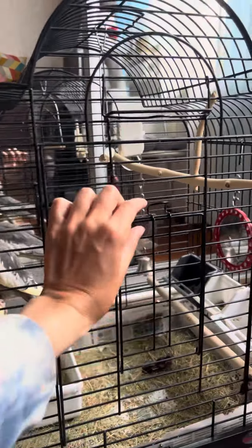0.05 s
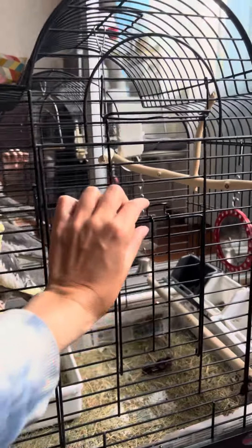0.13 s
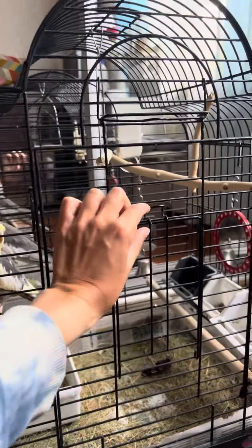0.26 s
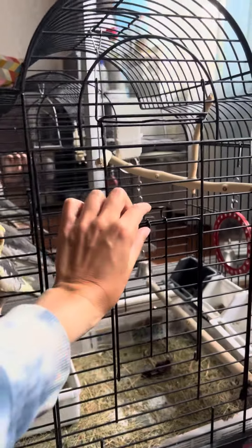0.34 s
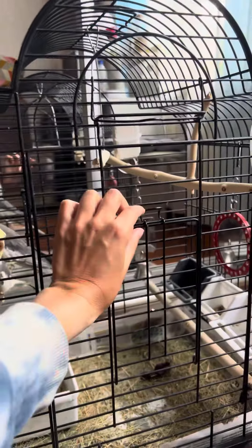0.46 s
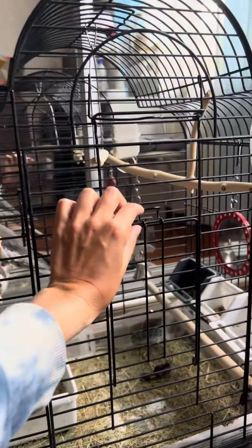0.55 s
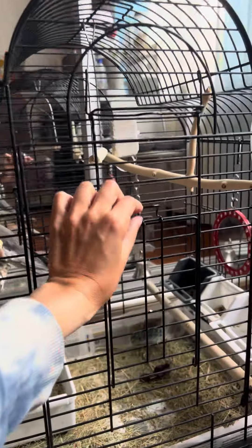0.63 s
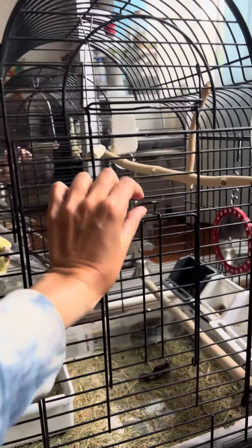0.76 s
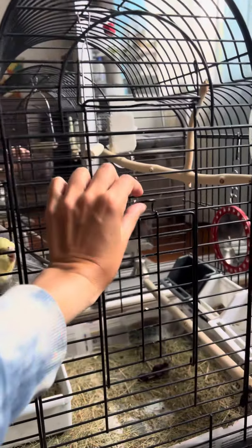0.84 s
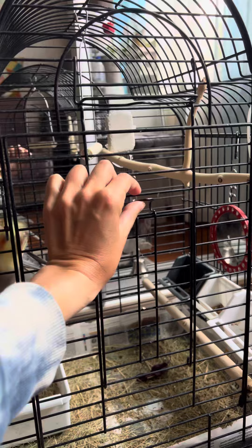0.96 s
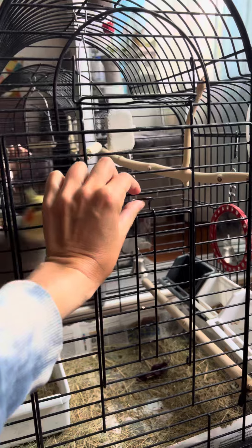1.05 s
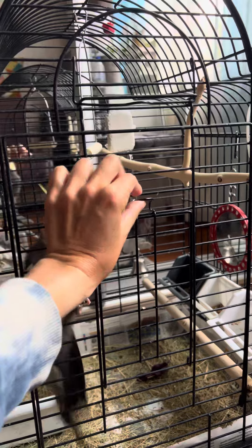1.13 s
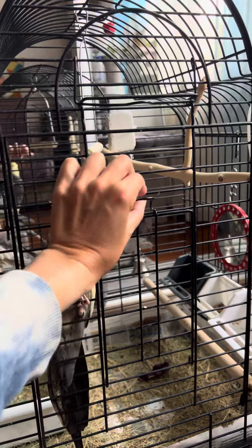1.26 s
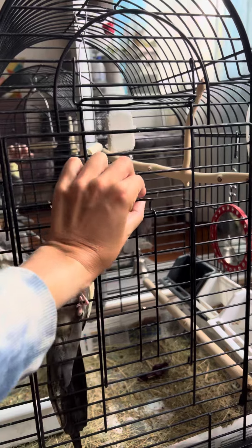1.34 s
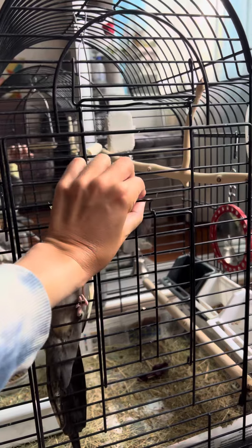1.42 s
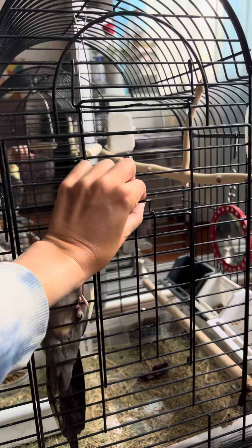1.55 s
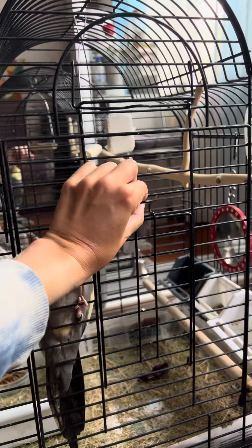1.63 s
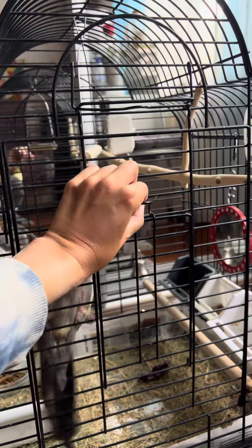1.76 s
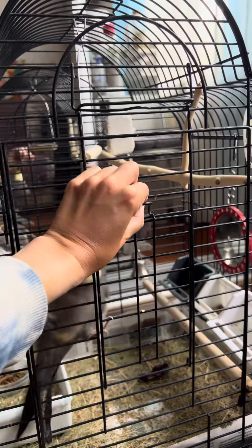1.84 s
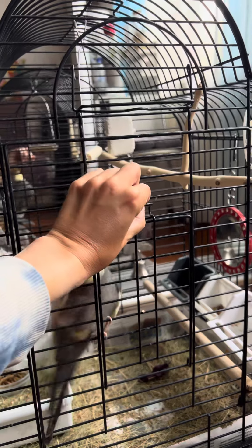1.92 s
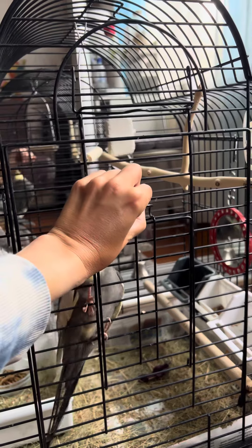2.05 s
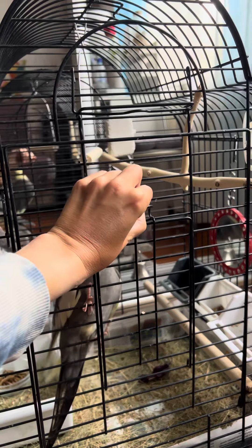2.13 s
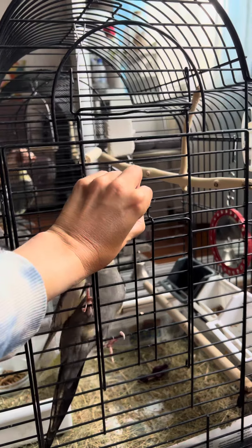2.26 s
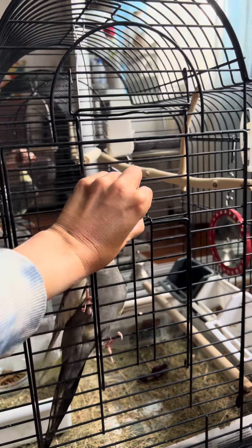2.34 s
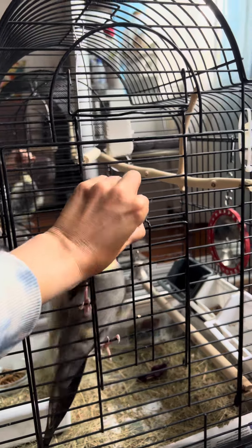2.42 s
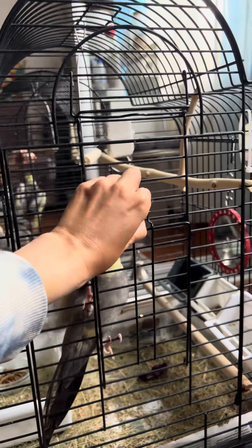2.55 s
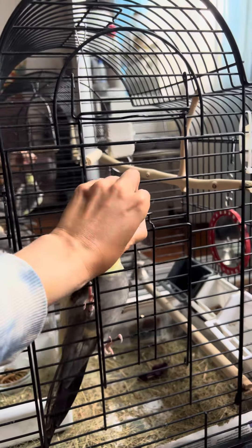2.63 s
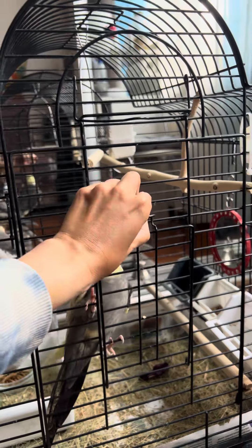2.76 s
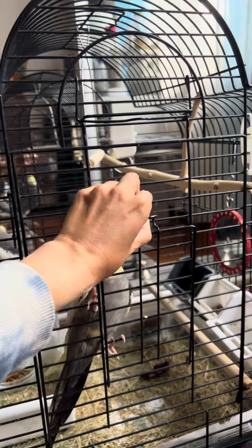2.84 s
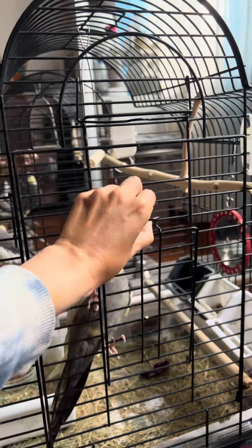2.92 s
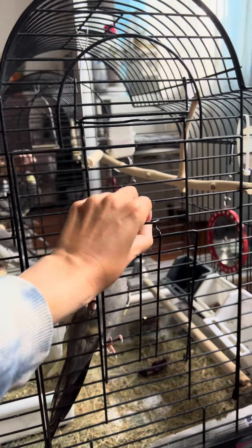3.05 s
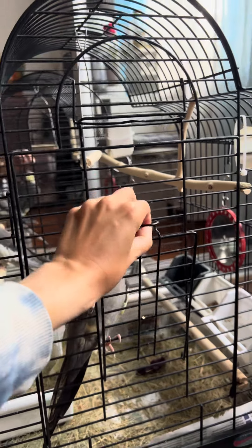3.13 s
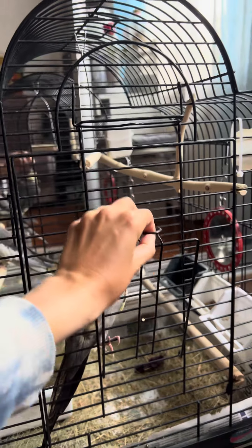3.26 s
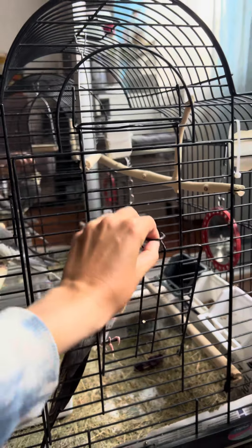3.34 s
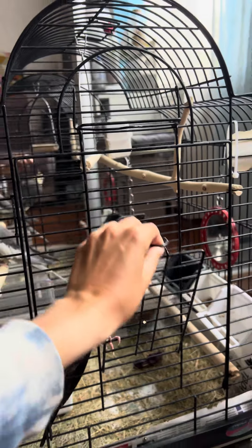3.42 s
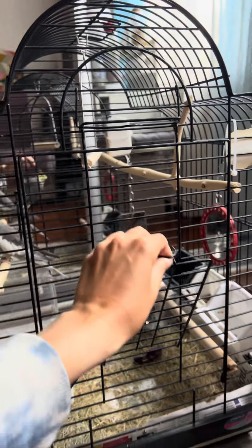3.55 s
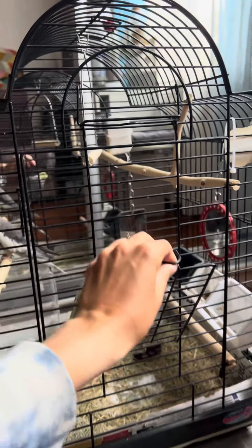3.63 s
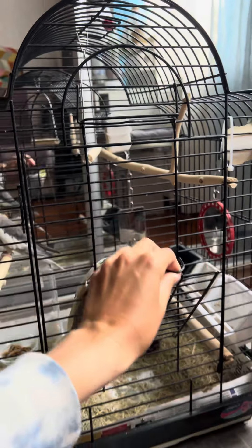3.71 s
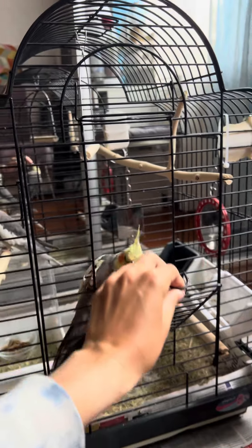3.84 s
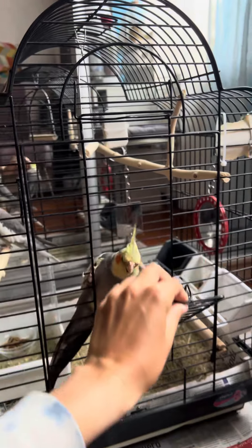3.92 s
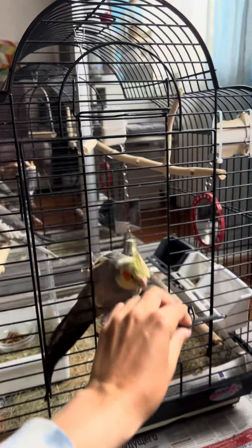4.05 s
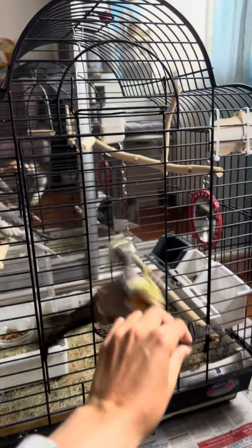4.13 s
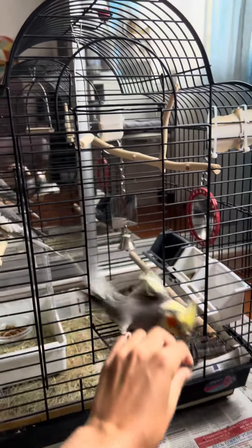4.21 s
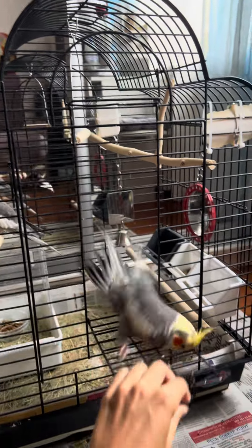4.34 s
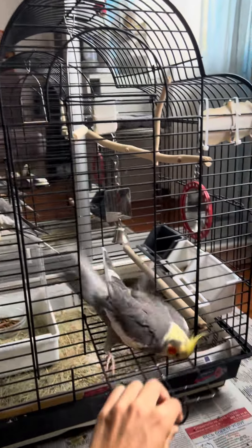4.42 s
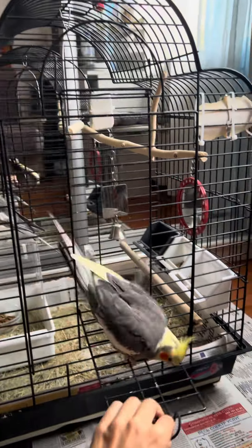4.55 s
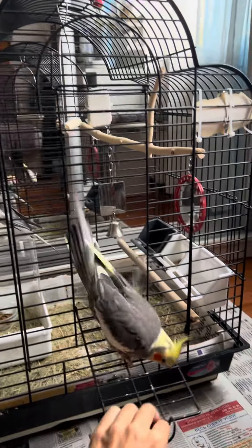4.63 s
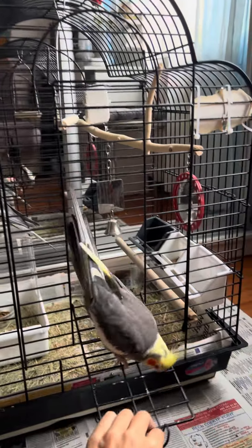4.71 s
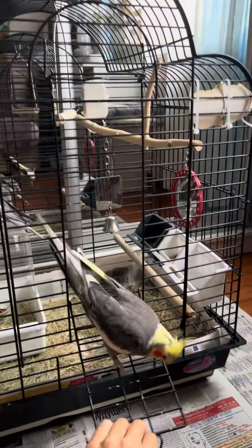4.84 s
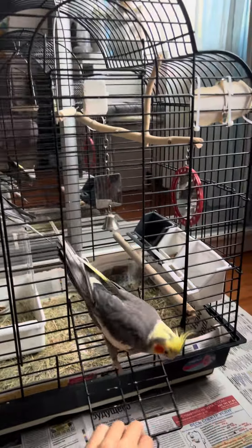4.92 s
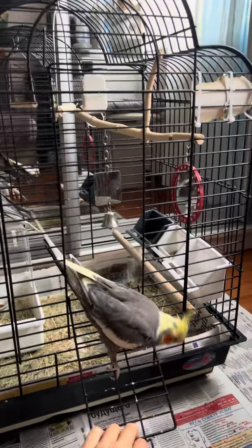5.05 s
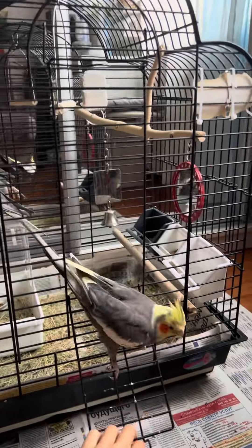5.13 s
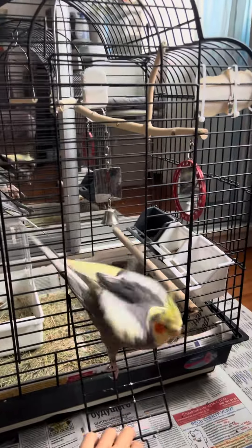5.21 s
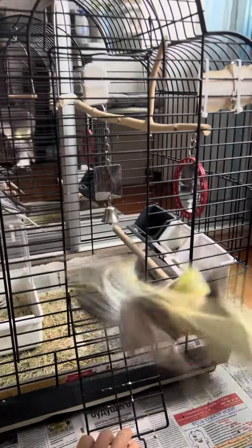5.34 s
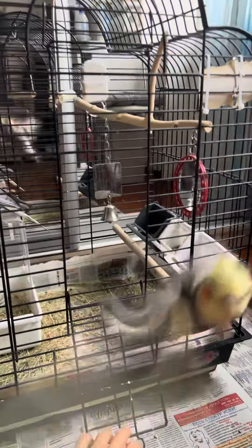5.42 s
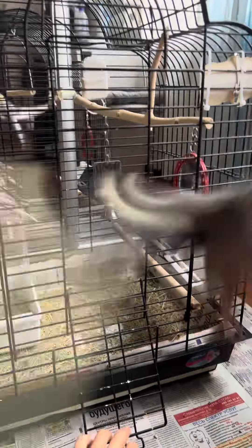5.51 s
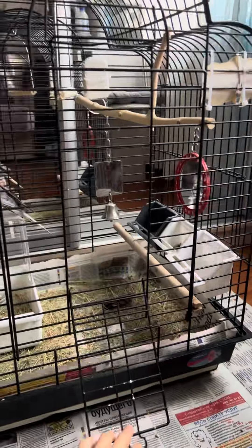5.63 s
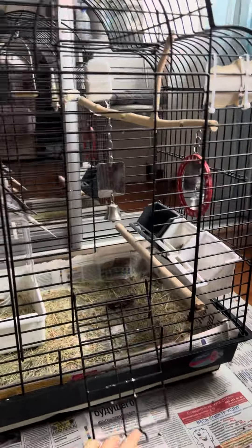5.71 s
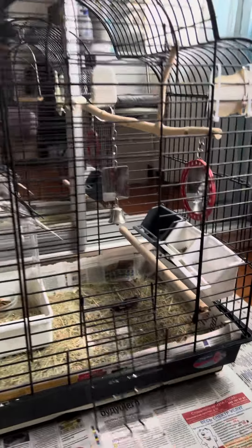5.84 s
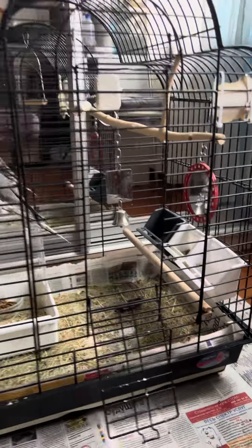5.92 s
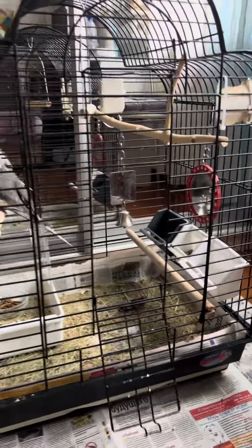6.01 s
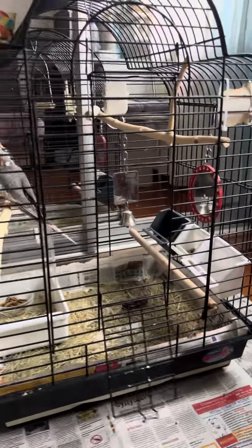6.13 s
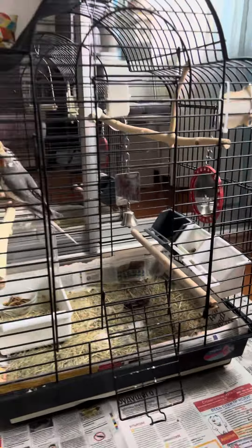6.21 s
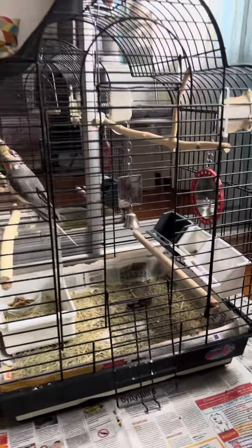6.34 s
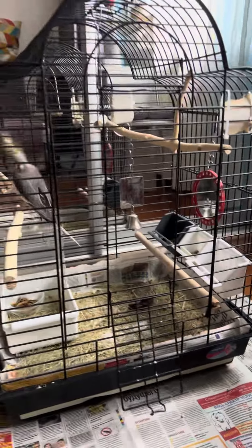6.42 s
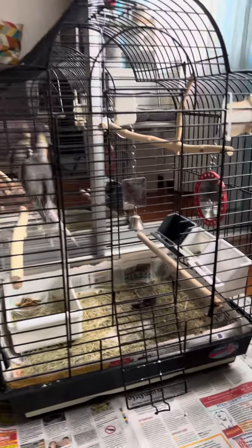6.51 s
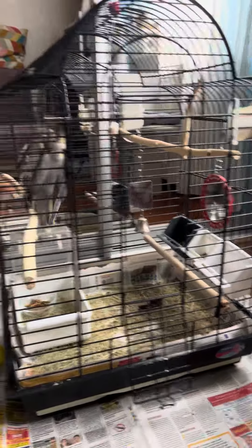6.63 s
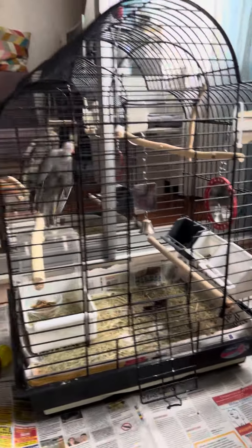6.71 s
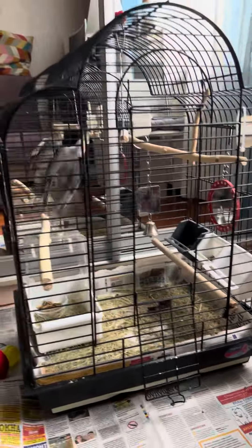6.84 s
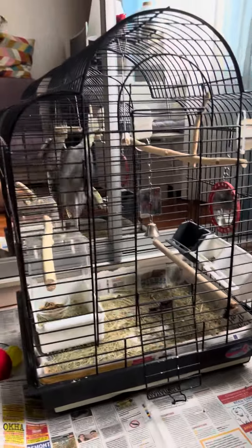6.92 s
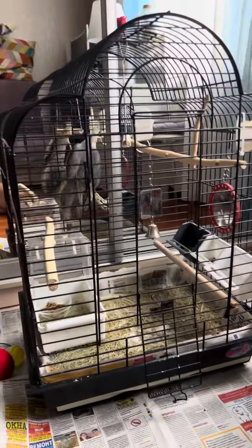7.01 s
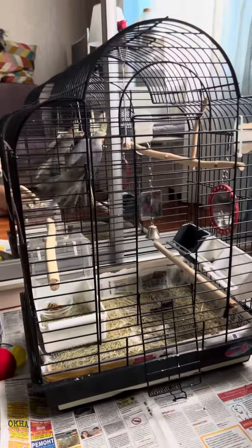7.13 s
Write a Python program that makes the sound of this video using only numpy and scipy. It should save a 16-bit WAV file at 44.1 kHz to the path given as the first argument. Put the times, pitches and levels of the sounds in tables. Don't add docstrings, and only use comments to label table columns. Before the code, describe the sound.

In a quiet, slightly reverberant room with a low appliance hum, fingers tick and scrape at a wire cage latch. A loud double metallic clank rings out, then claws tap lightly on bars. A bird takes off right past the microphone: soft feather hiss, deep air thumps and one hard wing-tip crack, after which the sound briefly ducks. Fluttering and light wire clicks follow farther away.

```python
import sys
import numpy as np
from scipy import signal
from scipy.fft import rfft, irfft
from scipy.io import wavfile
from scipy.ndimage import uniform_filter1d

SR = 44100
rng = np.random.default_rng(int(sys.argv[2]) if len(sys.argv) > 2 else 0)


def magnitude_from_level(level_db):
    exponent = np.asarray(level_db, float) / 20
    return 10 ** exponent


def wav_record(signal):
    frames = np.transpose(np.atleast_2d(signal))
    bounded = np.clip(frames, -1, 1)
    quanta = np.round(bounded * 32767).astype(np.int16)
    wavfile.write(sys.argv[1], SR, quanta)


N = 316197

# pitch_hz, level_db, t60_s
BARS = [(5840, -11, 0.31), (6190, -14, 0.48), (6620, -20, 0.65), (7316, -12, .3), (7452, -12, 0.3),
        (6509, -13, 0.4), (8166, -13.5, 0.4), (8637, -14, 0.4), (8880, -8, 0.39), (9168, -1.5, 0.38),
        (9350, -21.5, 0.78), (9530, -8, 0.4), (9730, -6, 0.35), (9820, -24.5, 0.75), (10860, -18.5, 0.52),
        (11530, -22, 0.43), (12300, -32.5, 0.48), (12590, -15, 0.58), (14425, -26, .5), (14570, -32, 0.72)]
# freq_hz, density_db (per Hz)
CAGE_SPECTRUM = [(41, -42), (70, -6.5), (204, -11.5), (293, -15.5), (451, 1), (541, -9.5), (635, -10),
                 (820, -12.5), (1020, -13), (1280, -12.5), (2780, -16), (5370, -20.5), (8860, -20),
                 (11600, -33.5), (16000, -41)]


def wire_modes(strikes, count=150):
    draw = rng.random((count, 2))
    bar_hz, bar_db, bar_t60 = np.transpose(BARS)
    hz = np.r_[5500 + 10200 * draw[:, 0], bar_hz]
    t60 = np.r_[.06 + .25 * draw[:, 1] ** 2, np.minimum(bar_t60, .3)]
    base_db = np.r_[read(CAGE_SPECTRUM, hz[:count]) + 12, bar_db]
    t = np.arange(SR // 2) / SR
    bank = np.exp(t * (2j * np.pi * hz - np.log(1000) / t60)[:, None]).astype(np.complex64)
    a, b, uneven = np.moveaxis(rng.standard_normal((strikes, 2, 3, len(hz))), 2, 0)
    weight = (a + 1j * b) * magnitude_from_level(base_db + 2.5 * uneven[:, :1])
    weight[:, 1] = .85 * weight[:, 0] + .5 * weight[:, 1]
    return (weight.astype(np.complex64) @ bank).real


# start_s, wire_db, tray_db, fade_s
CLANKS = [(1.042, -45, -48.5, 0.07), (1.1224, -46.5, -43, 0.0092), (1.1553, -36.5, -61, 0.017),
          (1.6545, -51, -44.5, 0.023), (1.6791, -46, -48.5, 0.025), (1.733, -43, -53, 0.041),
          (1.8741, -46, -60, 0.031), (2.1996, -66, -57.5, 0.14), (2.361, -15.5, -25.5, 0.042),
          (2.5088, -28, -36.5, 0.021), (4.039, -52.5, -43, 0.038), (4.0525, -50, -57.5, 0.16),
          (4.146, -42.5, -53, 0.13), (4.2015, -31.5, -50, 0.02), (4.372, -52.5, -59.5, 0.017),
          (4.3997, -47.5, -52, 0.029), (4.7233, -55.5, -60, 0.047), (5.2545, -46, -68, 0.016),
          (5.2767, -32, -38, 0.0082), (5.3525, -42.5, -71, 0.014), (5.4197, -35, -40.5, 0.012),
          (5.511, -33.5, -59, 0.016), (6.5989, -38, -45, 0.023), (6.834, -33, -48, 0.032),
          (7.1224, -46, -67, 0.04)]
# start_s, wire_db, tray_db, fade_s
STEPS = [(1.712, -43, -53, 0.054), (4.4146, -71, -39.5, 0.0076), (4.7602, -51, -57, 0.016),
         (5.021, -49, -85, 0.0059), (5.225, -45, -66.5, 0.019), (5.4627, -33, -47.5, 0.018),
         (5.798, -39, -60, 0.039), (6.3744, -38, -43.5, 0.041), (6.4901, -40, -50, 0.032),
         (6.54, -41.5, -46.5, 0.076), (6.7411, -43.5, -50, 0.072), (6.9678, -41, -80, 0.078),
         (7.098, -46, -53, 0.0094)]
# start_s, wire_db, tray_db, fade_s
BUMPS = [(.0094, -53.5, -66, 0.025), (.1694, -61.5, -78, 0.065), (5.145, -62.5, -66, 0.065),
         (.46, -67, -49.5, 0.017), (.854, -56, -60.5, 0.14), (.885, -56, -55, 0.14),
         (1.3775, -55.5, -63, 0.036), (1.9876, -34.5, -38, 0.019), (2.0859, -42.5, -50, 0.022),
         (2.4504, -18, -35, 0.0077), (2.585, -34.5, -46, 0.029), (3.968, -57.5, -73, 0.078),
         (4.5621, -41.5, -46, 0.017), (5.9275, -36, -55, 0.012), (6.066, -35, -38.5, 0.061),
         (6.2595, -38, -69, 0.035), (6.3353, -37, -43, 0.031)]
# start_s, wire_db, tray_db, fade_s
SCRAPES = [(1.072, -56, -52, 0.02), (1.095, -53, -49, 0.018), (.4352, -57, -71, 0.032),
           (.572, -57.5, -65, 0.021), (.9077, -69, -48, 0.015), (.9484, -78, -42.5, 0.015),
           (2.6994, -49.5, -58, 0.032), (2.7897, -59, -62, 0.027)]


def knocks():
    # knocks, frame dB over the mean of wire and tray, thin-wire dB over the wire
    kinds = (CLANKS, -7, -0.33), (STEPS, -3, -6), (BUMPS, -4.5, -40), (SCRAPES, 0.41, -19)
    rows = [(s, wire, (wire + tray) / 2 + frame, tray, wire + top, fade)
            for table, frame, top in kinds for s, wire, tray, fade in table]
    spread_s, wire_share = .007, .4
    out, t = np.zeros((2, N)), np.arange(SR // 2) / SR
    noises = rng.standard_normal((len(rows), 2, len(t)))
    for row, ring, noise in zip(rows, wire_modes(len(rows)), noises):
        s, wire_db, frame_db, tray_db, top_db, fade = row
        fall = np.exp(-t / max(fade, .003))
        clumps = evened(uniform_filter1d(noise[0, ::-1], size=130))
        crash = evened(coloured(noise, CAGE_SPECTRUM) * magnitude_from_level(1.3 * clumps))
        onset_rms = np.std(ring[:, :900], axis=1, keepdims=True)
        clear = ring / onset_rms * fall ** .5
        wire = magnitude_from_level(wire_db - 7.5) * (band(crash, 5900, 9800) * fall + wire_share * clear)
        frame = magnitude_from_level(frame_db) * band(crash, 2450, 6700, order=3) * fall ** 0.63
        thin = band(clear, 11870, 22000, order=4)
        thin = thin / np.std(thin[:, :900]) + .2 * band(crash, 11500, 21000, order=3)
        thin = magnitude_from_level(top_db) * thin * fall
        tray_rise = 1 - np.exp(-t / 0.0045)
        tray = magnitude_from_level(tray_db) * band(crash, 57, 2600) * tray_rise * fall ** 0.48
        add(out, s, (1 - np.exp(-t / spread_s)) * (wire + frame + thin + tray))
    return out


# start_s, peak_db, low_part_db (relative)
TICKS = [(1.072, -50, -15), (1.093, -46, -20), (1.1223, -29.5, -15), (1.1545, -42.5, -25), (1.659, -56, 4),
         (1.7325, -38, -15.5), (5.5999, -32.5, 1), (2.372, -32.5, -10.5), (2.398, -34, -12),
         (2.452, -33.5, -14), (4.416, -46, -6), (1.556, -57, -23), (1.9872, -43.5, 1), (2.3576, -30, -3),
         (2.509, -30.5, -16), (2.587, -31, -22), (4.1463, -34.5, -11), (4.2005, -21.5, -14),
         (4.373, -47.5, -19), (4.561, -49.5, -20), (5.2552, -27, -40), (5.355, -38.5, -20),
         (5.515, -19.5, -13), (5.518, -26.5, -10), (5.775, -33, -23), (5.928, -38, -25), (5.945, -48, -25),
         (5.972, -41.5, -27), (6.2597, -36, -18), (6.4894, -31.5, -15), (6.836, -38.5, -24)]


def ticks():
    out, t = np.zeros((2, N)), np.arange(600) / SR
    for (s, db, low_db), noise in zip(TICKS, rng.standard_normal((len(TICKS), 3, len(t)))):
        noise = noise[0] + 0.33 * noise[1:]
        tick = band(noise, 4500, 15000) + magnitude_from_level(low_db + 5) * band(noise, 500, 2900)
        add(out, s, magnitude_from_level(db - 3.5) * tick * np.exp(-t / 0.0033) * (1 - np.exp(-t / .0007)))
    return out


# start_s, hold_s, wire_db, tray_db
SHAKES = [(.45, 0.5, -99, -59), (.9, 0.043, -49, -53), (1.06, 0.02, -43, -68), (1.17, 0.15, -117, -53.5),
          (1.7, 0.22, -84, -53.5), (2.05, 0.12, -91, -51.5), (2.4, 0.037, -47, -39),
          (2.7, 0.18, -77.5, -52), (2.9, 0.76, -73.5, -57.5), (4.05, 0.28, -61, -50.5),
          (4.38, 0.18, -67, -53.5), (4.6, 0.31, -77.5, -59.5)]


def rattle():
    per_second = 1100
    size = magnitude_from_level(3.2 * np.minimum(rng.exponential(1, N), 4)) * (rng.random(N) < per_second / SR)
    patch, t = rng.integers(0, 4, N), np.arange(4096) / SR
    mix = np.zeros((2, N))
    for k, noise in enumerate(rng.standard_normal((4, 2, len(t)))):
        response = coloured(noise, CAGE_SPECTRUM) * magnitude_from_level(-60 * t / 0.14)
        mix += signal.oaconvolve((size * (patch == k))[None], response, axes=1)[:, :N]
    wire, tray = spells(SHAKES, rise_s=0.061, sag_db=22, release_db=320)
    return wire * band(mix, 1900, 15000, order=3) + tray * band(mix, 160, 1800)


# start_s, level_db, pitch_hz, rise_s, t60_s
CHIMES = [(1.185, -44.5, 990, .008, .12), (1.188, -46, 1100, .008, .12), (1.07, -56, 4150, .03, .25),
          (1.09, -56, 4750, .02, .25), (2.37, -41, 815, .02, .6), (2.37, -44, 1080, .01, .3),
          (2.375, -46, 1490, .01, .3), (2.365, -32, 460, .02, .7), (2.38, -42, 710, .02, .5),
          (.462, -55, 1000, .004, .12), (.462, -57, 1500, .004, .1), (1.99, -47, 620, .008, .25),
          (1.09, -57, 5600, .02, .25), (1.1, -58, 6300, .02, .2), (.945, -54, 1100, .01, .15),
          (.95, -58, 2600, .01, .2), (.93, -60, 4500, .02, .3), (.95, -55, 1850, .02, .25),
          (4.043, -49, 1600, .006, .2), (4.1, -54, 1300, .02, .3), (4.2, -53, 780, .006, .3),
          (4.055, -52, 1050, .01, .2), (4.41, -50, 1250, .01, .18),
          (1.195, -54, 2110, .01, .2), (2.4, -48, 1960, .05, 1.3), (2.38, -39, 1260, .01, .35),
               (1.08, -49, 1620, .03, .35), (6.835, -54, 9150, .005, .3), (6.5, -54, 2030, .05, 1.5),
               (1.2, -52, 1050, .015, 1.1), (5.8, -56, 2030, .03, 1.5), (2.55, -55, 7330, .06, .9),
               (6.8, -51, 1975, .06, 2.5), (6.85, -57, 2040, .06, 2.5), (6.84, -56, 6600, .005, .25),
               (6.28, -56, 9100, .02, .4), (4.043, -42, 430, .008, .3), (4.42, -52, 700, .008, .2),
               (2.37, -36, 622, .02, .5), (1.19, -53, 1250, .01, .15), (1.07, -51, 1880, .02, .25),
               (2.5, -54, 1040, .05, 1.6), (2.5, -55, 860, .05, 1.6), (6.26, -57, 2000, .02, .4),
               (6.27, -60, 4800, .01, .3), (6.9, -59, 1000, .1, 3), (6.95, -60, 1060, .1, 3),
               (2.7, -73, 4560, .05, 1.2), (2.76, -72, 4680, .05, 1.2), (2.72, -73, 4800, .05, 1.0),
               (1.08, -57, 4400, .02, .3), (1.735, -61, 14600, .004, .25), (1.155, -60, 15300, .004, .12),
               (1.155, -59, 14430, .004, .2), (2.365, -50, 14555, .004, .35),
               (2.365, -46, 11530, .004, .35)]


def chimes():
    out, t = np.zeros((2, N)), np.arange(SR) / SR
    notes = CHIMES
    wander = rng.standard_normal((len(notes), 3, SR))
    wander = evened(uniform_filter1d(uniform_filter1d(wander, size=400), size=400))
    for (s, db, hz, rise, t60), (drift, left, right) in zip(notes, wander):
        phase = 2 * np.pi * np.cumsum(hz + min(.012 * hz, 22) * drift) / SR
        waver = magnitude_from_level(3.5 * np.array([left, .6 * left + .8 * right]))
        add(out, s, magnitude_from_level(db - 60 * t / t60) * (1 - np.exp(-t / rise)) * np.sin(phase) * waver)
    return out


# freq_hz, density_db (per Hz)
FEATHER_SPECTRUM = [(180, -36), (300, 13), (425, 6), (537, -10), (614, -0.5), (828, -12.5), (1600, -8.5),
                    (2050, -9), (2500, -15.5), (3400, -20.5), (7950, -18.5), (9240, -17.5), (11000, -23),
                    (12600, -28), (14000, -24), (16000, -26.5)]
# start_s, hold_s, feather_hiss_db, whoosh_db
STROKES = [(5.245, 0.18, -44.5, -50.5), (5.48, 0.023, -43.5, -47), (5.555, 0.21, -47, -44.5),
           (5.79, 0.089, -46.5, -45.5), (5.91, 0.15, -53, -46.5), (6.065, 0.093, -48.5, -43),
           (6.27, 0.11, -48.5, -49), (6.36, 0.064, -49.5, -42), (6.48, 0.033, -44.5, -46.5),
           (6.58, 0.081, -49, -43), (6.7, 0.33, -56.5, -51.5), (6.83, 0.021, -48.5, -48.5),
           (6.98, 0.034, -46.5, -57), (7.1, 0.031, -50.5, -57)]


def feathers():
    fizz, whoosh = spells(STROKES, rise_s=0.016, sag_db=12, release_db=116)
    grain = magnitude_from_level(3.1 * evened(uniform_filter1d(rng.standard_normal(N), size=220)))
    air = hiss(FEATHER_SPECTRUM, patchy_db=1.8, size=512) * grain
    return fizz * band(air, 2470, 20000, order=3) + whoosh * band(air, 710, 2430)


# start_s, hold_s, rumble_db, flutter_db
GUSTS = [(5.3, 0.13, -37, -47), (5.415, 0.054, -32.5, -45.5), (5.49, 0.035, -26, -36.5),
         (5.615, 0.055, -29.5, -33.5), (5.67, 0.011, -24, -49), (5.796, 0.026, -22, -33.5),
         (5.84, 0.086, -21, -39), (5.895, 0.016, -24, -28.5), (5.95, 0.049, -27.5, -49),
         (6.03, 0.039, -28, -67), (6.13, 0.22, -43, -53), (6.41, 0.34, -45, -51), (6.77, 0.049, -44, -50),
         (6.96, 0.098, -56, -55)]


def wing_wash():
    rumble, flutter = spells(GUSTS, rise_s=0.013, sag_db=16, release_db=290)
    common, apart = rng.standard_normal(N), rng.standard_normal((2, N))
    out = rumble * band(common + 0.086 * apart, 44.7, 85.7)
    out += flutter * band(common + 0.16 * apart, 142, 421, order=4)
    out += magnitude_from_level(-21.5) * flutter * band(common[::-1] + .3 * apart, 410, 1040)
    return out


# start_s, peak_db, start_hz, end_hz, length_s
PUFFS = [(5.425, -18, 70, 42, 0.039), (5.5137, 1, 66, 60, .031), (5.5818, -12, 170, 165, .0135),
         (5.504, -32, 490, 440, 0.016), (5.5986, -1.5, 480, 78, .0122), (5.5986, -9, 420, 340, .0042),
         (5.58, -16.5, 21.1, 9.3, 0.091), (5.674, -31.5, 550, 420, 0.017), (5.674, -39, 1270, 690, 0.01),
         (5.799, -18.5, 255, 113, 0.014), (5.808, -20.5, 300, 280, 0.0135),
         (5.8265, -16.5, 103, 190, 0.026), (5.856, -20.5, 97, 120, 0.031), (5.865, -17.5, 360, 200, 0.0063),
         (5.8785, -12, 177, 85, 0.02), (5.9012, -12.5, 327, 330, 0.0068), (5.9105, -12.5, 89, 170, 0.021),
         (5.575, -21, 160, 110, .008), (7.015, -44, 373, 200, 0.018), (5.951, -25, 286, 88, 0.0316)]


def puffs():
    out, side = np.zeros((2, N)), np.array([[1], [-1]])
    lean, skew_rad = -0.028, 0.16
    for s, db, start_hz, end_hz, length in PUFFS:
        u = np.arange(round(length * SR)) / (length * SR)
        turns = np.cumsum(start_hz * (end_hz / start_hz) ** u) / SR
        swing = np.sin(2 * np.pi * turns + skew_rad * side * np.sin(np.pi * u))
        swell = np.sin(np.pi * u ** .6) ** .7 * np.minimum(6 - 6 * u, 1) * (1 - .35 * u)
        add(out, s, -magnitude_from_level(db) * swing * swell * (1 + lean * side))
    return out


# pitch_hz, level_db, port_difference (share)
CRACK = [(520, -3, .35), (780, -3.5, .5), (1300, 2, .45), (1750, -9, .3), (2690, -8, .3), (3620, -5, .2),
         (4600, -6, .2), (5150, -20, 4), (6190, -18, .6), (8300, -18, .5), (9200, -19, .5),
         (10480, -18, .5), (12400, -25, .6), (14100, -26, .6), (15400, -25, .6)]


def wing_slap():
    start_s, peak_db, length_s = 5.5964, -9, .003
    u = np.arange(round(length_s * SR)) / (length_s * SR)
    hz, ring_db, apart = np.transpose(CRACK)[:, :, None]
    quarter = np.array([[0], [1 / 4]])
    turn = 2 * np.pi * (rng.random(len(CRACK)) + quarter)[:, :, None]
    both, differ = magnitude_from_level(ring_db) * np.sin(2 * np.pi * hz * u * length_s + turn)
    crack = both.sum(0) + np.array([[1], [-1]]) * (apart * differ).sum(0)
    out = np.zeros((2, N))
    add(out, start_s, magnitude_from_level(peak_db) * crack * np.sin(np.pi * u ** 1.2) ** 2)
    return out


# pitch_hz, level_db
MOTOR_TONES = [(48.4, -48), (118.4, -52)]
# freq_hz, density_db (per Hz)
AIR_SPECTRUM = [(100, -60.5), (170, -14), (298, -8), (388, -5), (426, -8), (486, -16.5), (681, -21),
                (734, -27.5), (852, -17), (1150, -28.5), (1680, -16), (2040, -16.5), (2720, -37.5),
                (3600, -26.5), (4200, -34.5), (4650, -30.5), (5350, -38), (13000, -41), (15500, -60.5)]


def room_tone():
    slow = uniform_filter1d(rng.standard_normal((4, N)), size=3000)
    slow = evened(uniform_filter1d(slow, size=3000))
    out = magnitude_from_level(-58.0) * band(rng.standard_normal(N), 70, 136.5)
    for k, (hz, db) in enumerate(MOTOR_TONES):
        phase = 2 * np.pi * np.cumsum(hz * (1 + .012 * slow[k + 2])) / SR
        out = out + magnitude_from_level(db + 1.5 + 1.8 * slow[k]) * np.sin(phase)
    return out + magnitude_from_level(-61) * hiss(AIR_SPECTRUM, patchy_db=1.5, size=2048)


# freq_hz, t60_s
REVERB = [(250, 0.83), (1000, 0.69), (4000, 0.39), (12000, 0.31)]


def room(x):
    taps = np.zeros((2, SR))
    at = np.arange(200, SR - 20, 20) + rng.integers(0, 20, (2, (SR - 201) // 20))
    np.put_along_axis(taps, at, rng.choice([-1., 1.], at.shape), 1)
    taps[1] = .5 * taps[0] + 0.38 * taps[1]
    hz, t, z = signal.stft(taps, SR, nperseg=256)
    tail = signal.istft(z * magnitude_from_level(-60 * t / read(REVERB, hz)[:, None]), SR, nperseg=256)[1]
    return signal.fftconvolve(x, tail / np.linalg.norm(tail[0]), axes=1)[:, :N]


# freq_hz, correlation
LIKENESS = [(60, 1.0), (150, 0.95), (380, 1), (950, 0.23), (2380, 0.65), (5980, 0.12), (15000, 0.17)]


def hiss(spectrum, patchy_db, size=1024):
    frames, hz = 4 * N // size + 5, np.fft.rfftfreq(size, 1 / SR)
    a, b, c, d, patches = rng.standard_normal((frames, len(hz), 5)).T
    patches = evened(uniform_filter1d(uniform_filter1d(patches, size=10, axis=0), size=12, axis=1))
    same, left = np.clip(read(LIKENESS, hz), -1, 1)[:, None], a + 1j * b
    z = np.array([left, same * left + np.sqrt(1 - same ** 2) * (c + 1j * d)])
    z *= magnitude_from_level(read(spectrum, hz)[:, None] + patchy_db * patches)
    return evened(signal.istft(z, nperseg=size, noverlap=size * 3 // 4)[1][:, :N])


def coloured(noise, spectrum, ripple_db=2.0):
    hz = np.fft.rfftfreq(noise.shape[-1], 1 / SR)
    same = np.clip(0.53 + 0.45 * read(LIKENESS, hz), -1, 1)
    left, other = rfft(noise)
    bumps = uniform_filter1d(noise[1, -200:], size=2) * np.sqrt(2)
    ripple = np.interp(hz, np.arange(200) * 110, bumps)
    pair = np.array([left, same * left + np.sqrt(1 - same ** 2) * other])
    return irfft(pair * magnitude_from_level(read(spectrum, hz) + ripple_db * ripple))


def spells(rows, rise_s, sag_db, release_db):
    start, hold, *db = np.transpose(rows)[:, :, None]
    grid = np.arange(0, N / SR, .001)
    t = np.maximum(grid - start, 0)
    form = np.minimum(t / rise_s, 1) * magnitude_from_level(-sag_db * t - release_db * np.maximum(t - hold, 0))
    gains = [np.sqrt(((magnitude_from_level(d) * form) ** 2).sum(0)) for d in db]
    return [np.interp(np.arange(N) / SR, grid, gain) for gain in gains]


def evened(x):
    return x / np.sqrt(np.mean(x ** 2) + 1e-20)


def band(x, lo_hz, hi_hz, order=2):
    return evened(signal.sosfilt(signal.butter(order, [lo_hz, hi_hz], "band", fs=SR, output="sos"), x))


def read(points, hz):
    f, value = np.transpose(points)
    return np.interp(np.log(hz + 1), np.log(f + 1), value)


def add(mix, s, sound):
    part = mix[:, round(s * SR):][:, :sound.shape[1]]
    part += sound[:, :part.shape[1]]


# freq_hz, lead_rad
LEAD = [(100, 0), (600, .7), (950, 0), (2100, 0), (4200, -.2), (5400, -1.2), (16000, -1.6)]
# freq_hz, balance_db
LEAN = [(300, 0.4), (700, 2.5), (1300, 2.5), (2400, -1), (8000, -0.3)]


def ports(x):
    hz = np.fft.rfftfreq(N + 1, 1 / SR)
    half = magnitude_from_level(read(LEAN, hz) / 2) * np.exp(.5j * read(LEAD, hz))
    return irfft(rfft(x, N + 1) * half ** np.array([[1], [-1]]))[:, :N]


# time_s, gain_db
DUCK = [
    (5.603, 0),
    (5.605, -38),
    (5.64, -28),
    (5.68, -15),
    (5.79, -8),
    (5.8, 0),
]


def scene():
    near = knocks() + ticks() + rattle() + chimes()
    wings = feathers()
    airborne = near + magnitude_from_level(-7.5) * room(near) + wings + magnitude_from_level(-5.5) * room(wings) + room_tone()
    duck = magnitude_from_level(np.interp(np.arange(N) / SR, *np.transpose(DUCK)))
    return ports(airborne) * duck + wing_wash() + puffs() + wing_slap()


def band_limit(x):
    return signal.sosfilt(signal.butter(12, 16830, fs=SR, output="sos"), x)


# freq_hz, gain_db
MIC = [(10600, 0.5), (11000, -9.5), (12800, -10), (14000, -3)]


def record(dry):
    hz, edge_hz = np.fft.rfftfreq(N + 1, 1 / SR), 15900
    heard = irfft(rfft(dry, N + 1) * magnitude_from_level(read(MIC, hz)) * (hz < edge_hz))[:, :N]
    return band_limit(1.447 * np.tanh(heard / 1.503))


dry = scene()
out = record(dry)
wav_record(out)
```